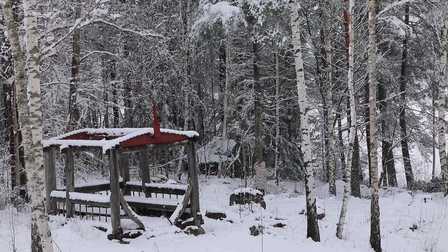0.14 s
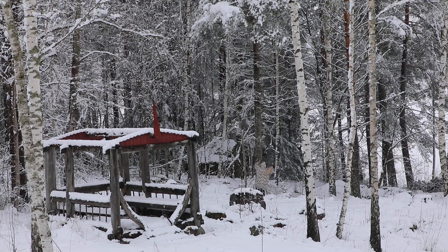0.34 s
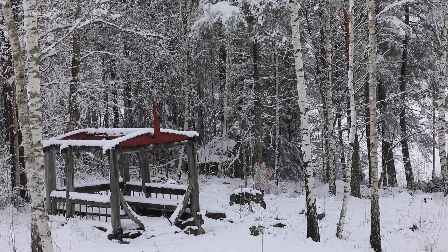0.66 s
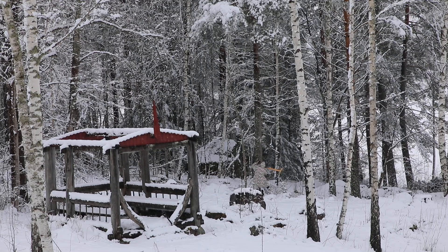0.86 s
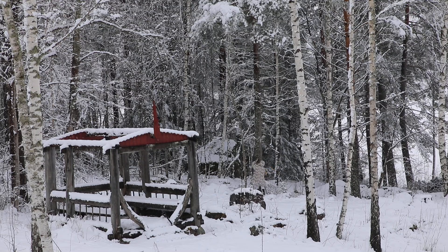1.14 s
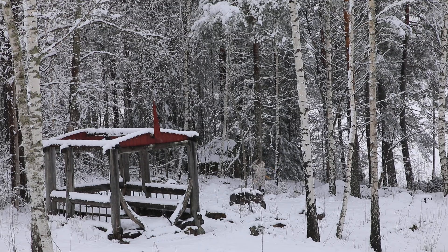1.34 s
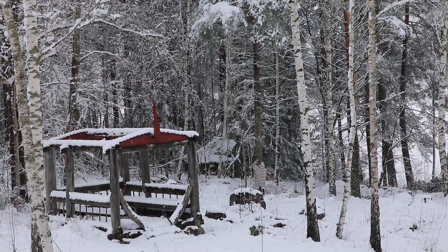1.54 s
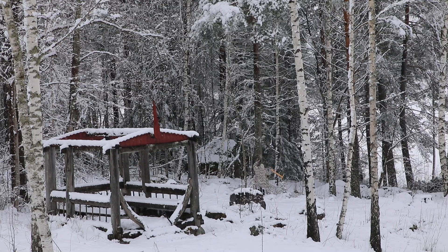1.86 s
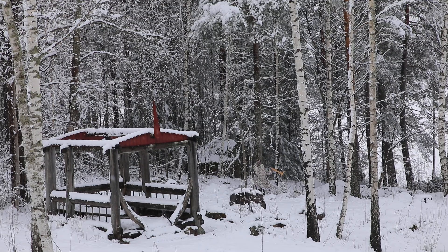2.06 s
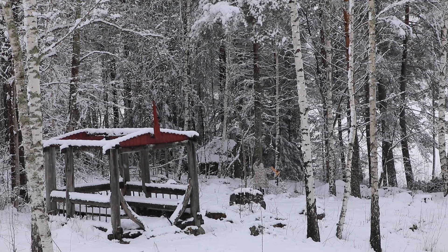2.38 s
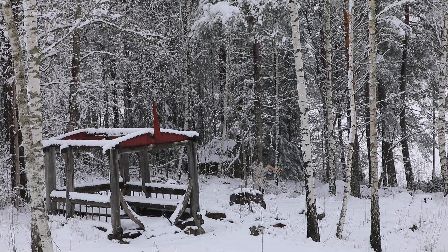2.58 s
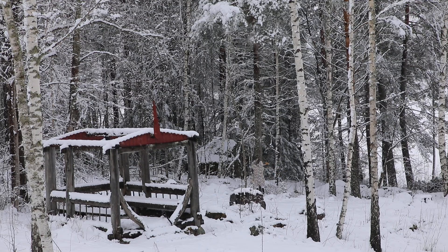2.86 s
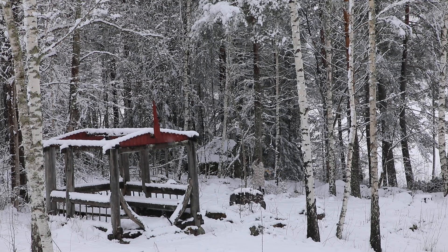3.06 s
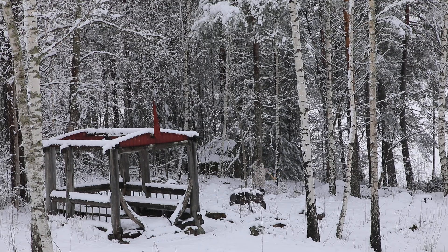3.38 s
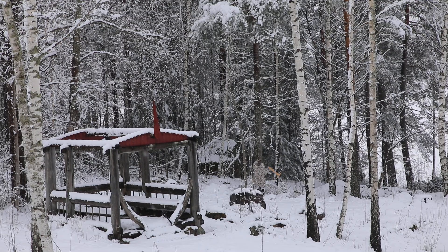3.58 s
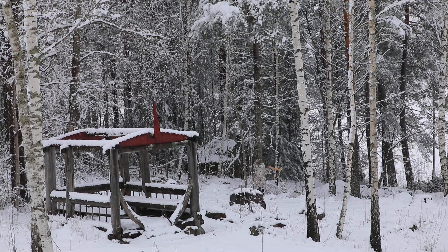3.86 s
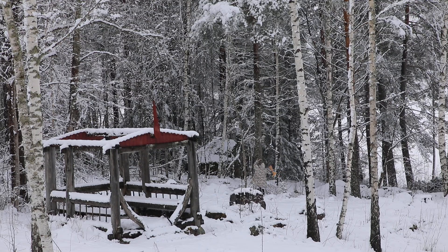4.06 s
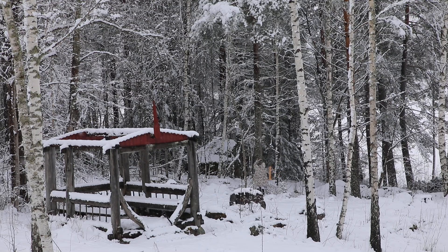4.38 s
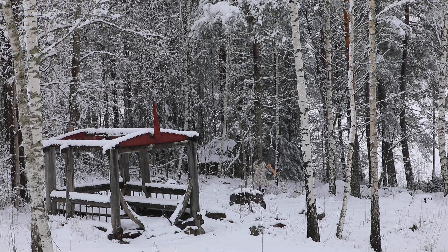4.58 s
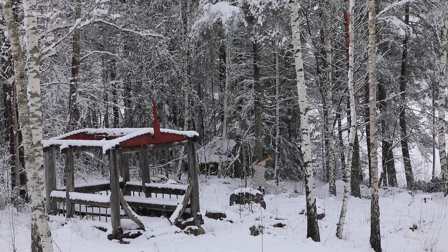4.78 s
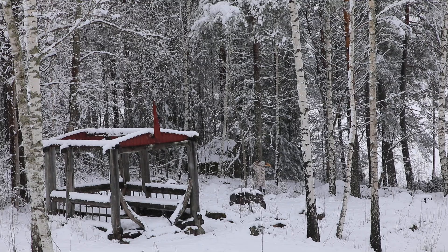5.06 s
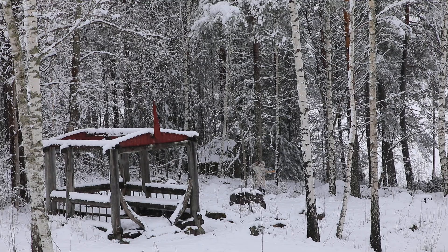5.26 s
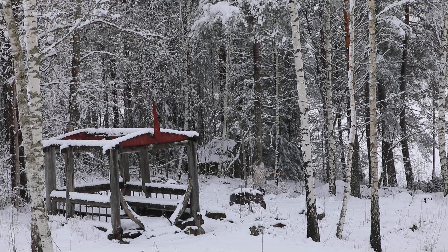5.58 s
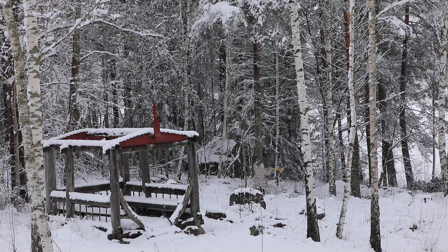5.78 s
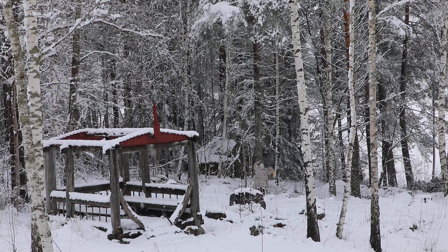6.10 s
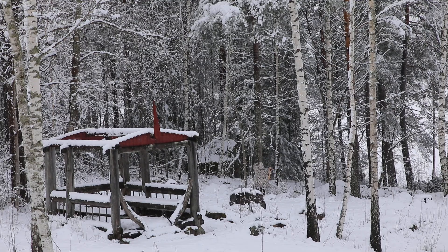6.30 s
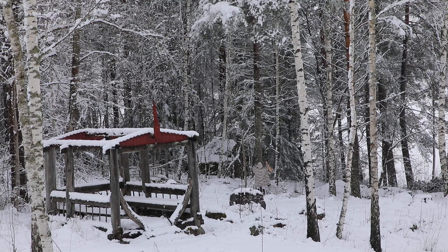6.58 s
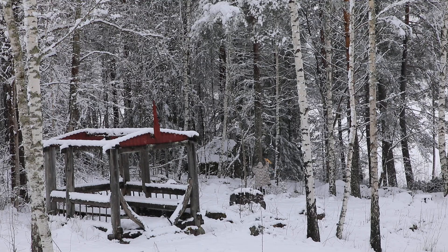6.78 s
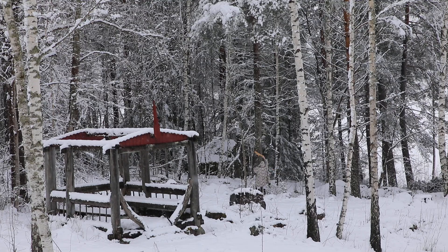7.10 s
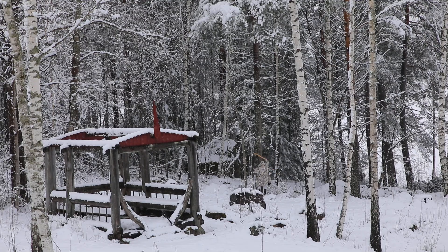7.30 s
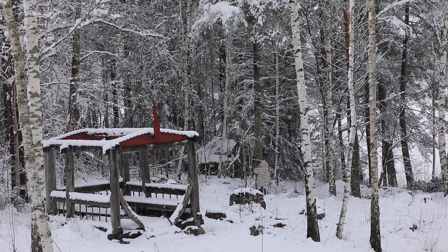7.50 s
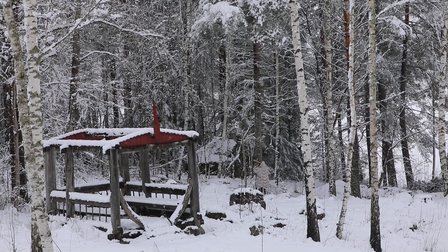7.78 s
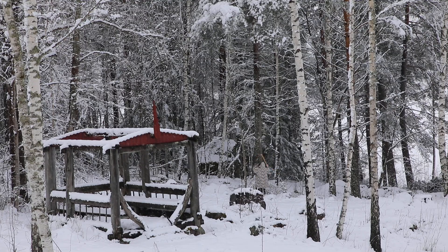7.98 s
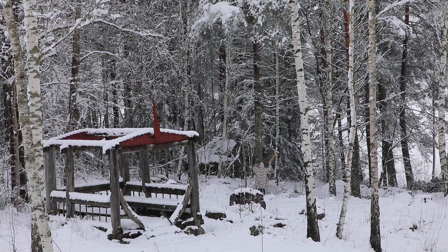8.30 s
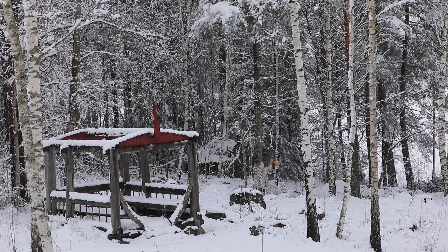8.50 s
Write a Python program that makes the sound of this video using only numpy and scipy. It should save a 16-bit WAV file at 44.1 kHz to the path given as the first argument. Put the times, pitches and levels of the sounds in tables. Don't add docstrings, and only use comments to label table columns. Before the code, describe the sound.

Four separate axe chops ring hollow on a standing trunk in a snowy forest, each with a scattered echo, while small finches chirp faintly between.

```python
import sys
import numpy as np
from scipy import signal
from scipy.fft import rfft, irfft, next_fast_len
from scipy.io import wavfile
from scipy.ndimage import uniform_filter1d, map_coordinates

SR = 44100
rng = np.random.default_rng(int(sys.argv[2]) if len(sys.argv) > 2 else 0)


def ratio(d):
    e = np.asarray(d, float) / 20
    return 10 ** e


def dump(signal):
    limited = np.clip(np.atleast_2d(signal).T, -1, 1)
    pcm = np.round(limited * 32767).astype(np.int16)
    wavfile.write(sys.argv[1], SR, pcm)


N = 381465


def unit(x):
    return x / np.sqrt(np.mean(x ** 2) + 1e-20)


def along(points, hz):
    f, v = np.transpose(points)
    return np.interp(np.log(hz + 1), np.log(f + 1), v)


def curves(rows):
    s, *cols = np.transpose(rows)
    return [np.interp(np.arange(N) / SR, s, c) for c in cols]


def filtered(x, response):
    m = next_fast_len(len(x) + 8192)
    spectrum = rfft(x, m) * response(np.fft.rfftfreq(m, 1 / SR))
    return irfft(spectrum, m)[:len(x)]


def peak(f, hz, width_hz):
    return 1j * f * width_hz / (hz * hz - f * f + 1j * f * width_hz)


def add(out, s, piece):
    part = out[round(s * SR):][:len(piece)]
    part += piece[:len(part)]


def burst(length):
    spectrum = rfft(np.exp(-np.arange(512) / SR / length) * rng.standard_normal(512))
    even = irfft(spectrum / np.abs(spectrum))
    return np.pad(even, (0, SR // 4))


def tail(t60s, rise, lumps_db):
    hz, t, z = signal.stft(rng.standard_normal(2 * SR), SR, nperseg=256)
    lumps = unit(uniform_filter1d(rng.standard_normal(len(t)), size=5))
    decay_db = -60 * t / along(t60s, hz)[:, None]
    fade = ratio(lumps_db * lumps + decay_db) * (1 - np.exp(-t / rise))
    fade = fade / np.linalg.norm(fade, axis=1, keepdims=True)
    h = signal.istft(z * fade, SR, nperseg=256)[1]
    return h / np.linalg.norm(h)


# (frequency [Hz], width [Hz], level in blows 1, 2, 3, 4 [dB])
WOOD_MODES = [(86.2, 39.7, -42, -47.5, -60.5, -41), (249.7, 35, -23, -24, -39.5, -20.5),
              (500, 180, -10, -9.5, -7.5, -8.5), (714, 99, -8.5, -3, 0.5, -6.5),
              (883, 64, -2, 5.5, 5.5, -1.5), (1037, 170, -9, 2, 4, -2.5), (1410, 200, 2, -15, 2.5, -9),
              (1740, 270, -8, 1, 2.5, -9.5), (1925, 74, -36.5, 7, 7.5, -13.5),
              (2173, 170, -6, -0.5, 5, -11), (2540, 120, -6.5, -9, -2.5, -13),
              (2796, 186, 0, -11, -2.5, -7), (3725, 156, -15, -12, -4, -16), (4000, 320, -34, -16, -35, -9)]


def thud(k):
    def response(f):
        modes = 0
        for j, mode in enumerate(WOOD_MODES):
            hz, width_hz, gain_db = mode[0], mode[1], mode[2 + k]
            modes = modes + (-1) ** j * ratio(gain_db) * peak(f, hz, width_hz) / np.sqrt(width_hz)
        return modes / (1 + 1j * f / 4000) ** 3
    push = filtered(burst(0.00049), response)
    return push / np.linalg.norm(push)


# (frequency [Hz], level [dB])
BLADE = [(3200, -21), (4300, 3.5), (5600, -3), (7600, 0.5), (8800, -8), (10500, -9), (12500, -28),
         (15500, -42)]
# (length [s], level of its scatter [dB])
TEARING = [(0.0037, 5), (0.0021, -4), (0.0016, -7), (0.0033, -8)]


def crack(k):
    splinters = filtered(burst(TEARING[k][0]), lambda f: ratio(along(BLADE, f)))
    return splinters / np.linalg.norm(splinters)


# (delay [s], level [dB], treble lost on bark and snow [dB])
NEAR_ECHOES = [(.003, -6.5, -8), (.0055, -4.5, -14.5), (.0082, -2.5, 1.5), (0.012, -17, -25),
               (0.0129, -8.5, -6.5), (.015, -5.5, -11)]


def near_paths(near_db):
    paths = np.zeros((2, SR // 20))
    paths[:, 0] = 1
    lucks = rng.standard_normal((len(NEAR_ECHOES), 2))
    for (delay, echo_db, dull_db), (shift, sign) in zip(NEAR_ECHOES, lucks):
        at = round((delay + .0003 * shift) * SR)
        level_db = near_db + echo_db
        paths[:, at] += ratio([level_db, level_db + dull_db]) * np.sign(sign)
    return paths


# (frequency [Hz], t60 [s])
TWIGS = [(4000, .6), (7500, 0.42), (11000, 0.24), (15000, .15)]


def twig_scatter(k, cracked):
    return ratio(TEARING[k][1]) * signal.fftconvolve(cracked, tail(TWIGS, 0.0072, lumps_db=-0.5))


AROUND = [
    [-20.5, -8, -1, -1, -3.5, 2.5, -3, -11.5, 0, -12.5, -5.5, -19, -28],
    [-17.5, -13.5, -6.5, -0.5, 1, -12.5, -6, 3.5, -9, -17, -9, -15.5, -30],
    [-25, -19.5, -7, 1.5, -6, -13.5, -11.5, 1.5, -8.5, -16, -15.5, -21, -28.5],
    [-22, -8.5, 0, 4.5, -6, -31, -10.5, -5.5, -8, -21, -12, -27, -32],
]
# (frequency [Hz], t60 [s])
SCATTER = [(100, 1), (400, 0.72), (900, 0.62), (2000, 0.51), (4000, 0.51), (8000, 0.17), (14000, 0.22)]
# (frequency [Hz], t60 [s])
FAR_SLOPES = [(200, 2), (860, 3.77), (2000, 1.7), (5000, 3)]
# (frequency [Hz], level [dB])
FOREST_LOSS = [(120, -18), (250, -0.5), (2950, -1.5), (3250, -8), (3600, -8), (4500, -8), (6000, -33.5),
               (9900, -90.5)]
# (delay [s], lift [dB], depth [s])
GROVES = [
    (.1, -0.3, 0.022),
    (.245, 2.5, 0.0526),
    (.58, 0.5, .07),
]
SMEAR = 1.16
SLOPES_DB = -17


def forest(k):
    def response(f):
        power = 0
        for lift_db, mode in zip(AROUND[k], WOOD_MODES[1:]):
            power = power + np.abs(ratio(lift_db) * peak(f, mode[0], SMEAR * mode[1])) ** 2
        return np.sqrt(power) * ratio(along(FOREST_LOSS, f))
    trunks = tail(SCATTER, 0.0057, lumps_db=1.47)
    slopes = ratio(SLOPES_DB) * tail(FAR_SLOPES, 0.067, lumps_db=1.5)
    back = filtered(trunks + slopes, response)
    t = np.arange(len(back)) / SR
    back *= ratio(sum(lift_db * np.exp(-((t - delay) / depth) ** 2) for delay, lift_db, depth in GROVES))
    return back / np.linalg.norm(back)


THUMP_DB, THUMP_GROWS = -57.5, 0.31
THUMP_HZ, THUMP_S, THUMP_LAG_S = 94.3, 0.018, 0.0032


def ground_thump(db):
    u = np.arange(SR // 4) / SR / THUMP_S
    swell = u * np.exp(1 - u)
    return ratio(THUMP_DB + THUMP_GROWS * db) * swell * np.sin(2 * np.pi * THUMP_HZ * THUMP_S * u)


# (time [s], energy [dB], blade crack [dB], near echoes [dB], forest energy [dB])
BLOWS = [
    (1.2188, 5.5, -34.5, -11, 3.5),
    (3.0152, 8.5, -29, -1, 6),
    (5.0512, 13, -24.5, -2.5, 11),
    (7.5328, 8, -23, -5, 3.5),
]


def axe():
    out = np.zeros(N)
    for k, (s, db, crack_db, near_db, forest_db) in enumerate(BLOWS):
        thud_path, crack_path = near_paths(near_db)
        cracked = ratio(db + crack_db) * crack(k)
        add(out, s, signal.fftconvolve(ratio(db) * thud(k), thud_path))
        add(out, s, signal.fftconvolve(cracked, crack_path))
        add(out, s, twig_scatter(k, cracked))
        add(out, s, ratio(forest_db) * forest(k))
        add(out, s + THUMP_LAG_S, ground_thump(db))
    return out


# (time [s], level [dB], centre [Hz], width [Hz], t60 [s])
TICKS = [(.21, -62, 7000, 1500, .02), (0.705, -53, 9300, 6960, 0.038), (1.126, -63, 6000, 4000, .04),
         (5.356, -66, 8150, 3980, .08), (6.186, -60, 7310, 4440, .1), (6.198, -59, 7500, 3980, 0.19),
         (6.868, -64.5, 6000, 3010, 0.07), (8.424, -46, 9020, 9000, 0.0062),
         (8.4266, -31, 6870, 9000, 0.006), (8.4303, -37, 6900, 2000, 0.021),
         (8.434, -41, 6860, 2500, 0.0052), (8.434, -57.5, 6800, 1200, 0.24),
         (8.4435, -49, 2150, 1780, 0.11), (8.446, -48, 556, 906, 0.25), (8.5007, -46, 7060, 9000, .005)]


def ticks():
    out, t = np.zeros(N), np.arange(SR // 4) / SR
    for s, db, hz, width_hz, t60 in TICKS:
        puff = unit(filtered(rng.standard_normal(len(t)), lambda f: peak(f, hz, width_hz) ** 2))
        add(out, s, ratio(db - 60 * t / t60) * (1 - np.exp(-t / 0.00039)) * puff)
    return out


# (time [s], level [dB], dip [Hz], end [Hz])
HOOKS = [(0.073, -60.5, 2690, 2770), (.148, -63.5, 2770, 2900), (.222, -63.5, 2770, 2880),
         (1.208, -64, 2870, 2800), (2.281, -64, 2515, 2810), (4.096, -63, 2670, 2970),
         (4.166, -65, 2500, 3000), (4.69, -61.5, 2630, 2780), (4.768, -61.5, 2700, 2930),
         (4.851, -64.5, 2870, 2740), (4.924, -62, 2660, 2590), (5.628, -65, 2580, 2580),
         (5.703, -65, 2860, 2770), (5.773, -63.5, 2670, 2850), (5.863, -62, 2780, 2740),
         (5.947, -64, 2760, 2590), (6.022, -63.5, 2670, 2590), (6.118, -61, 2660, 2970),
         (6.62, -64, 2520, 2820), (6.69, -62.5, 2590, 2830), (6.767, -63.5, 2800, 2710),
         (6.845, -61, 2850, 2780)]
HOOK_FROM_HZ, HOOK_S, HOOK_BREAK = 3700, .038, 0.58
# (time [s], level [dB], end [Hz])
OPENERS = [(.008, -64, 2860), (1.135, -62, 2880), (2.198, -66, 2420), (2.599, -66, 2830),
           (4.042, -67.5, 3050), (4.622, -64, 3040), (6.55, -66, 2700), (7.502, -64, 2880)]
OPEN_FROM_HZ, OPEN_S = 2450, 0.032
# (time [s], level [dB], pitch [Hz], length [s])
PIPS = [(.04, -66.5, 1195, .06), (0.088, -66, 1026, 0.059), (0.447, -77, 4800, .045),
        (.585, -67, 1153, .046), (0.678, -64, 2460, .015), (0.77, -69, 1030, 0.057)]
PIP_SAG = .02


def finches():
    out = np.zeros(N)
    notes = [(s, db, HOOK_FROM_HZ, dip_hz, end_hz, HOOK_S, HOOK_BREAK) for s, db, dip_hz, end_hz in HOOKS]
    notes += [(s, db, OPEN_FROM_HZ, OPEN_FROM_HZ, end_hz, OPEN_S, 0) for s, db, end_hz in OPENERS]
    notes += [(s, db, hz * (1 + PIP_SAG), hz, hz * (1 - PIP_SAG), length, 0) for s, db, hz, length in PIPS]
    for s, db, start_hz, dip_hz, end_hz, length, gap in notes:
        t = np.arange(round(length * SR)) / SR
        done = t / length
        slide = 1 / (1 + np.exp(-(done - .45) / 0.063))
        hz = dip_hz + (start_hz - dip_hz) * np.exp(-t / 0.0028) + (end_hz - dip_hz) * slide
        swell = (1 - np.exp(-t / 0.0013)) * np.cos(np.pi / 2 * done) ** 0.33
        swell *= 1 - gap * np.exp(-((done - .45) / 0.12) ** 2)
        flutter = unit(uniform_filter1d(rng.standard_normal(SR // 10), size=180))
        swell *= ratio(3.0 * flutter[:len(t)])
        add(out, s, np.sqrt(2) * ratio(db) * swell * np.sin(2 * np.pi * np.cumsum(hz) / SR))
    return out


# (start [s], length [s], level [dB])
WHEEZES = [
    (-.1, .66, -72),
    (5.93, .66, -67),
]
# (frequency [Hz], width [Hz], level [dB])
THROAT = [(3420, 1100, 10), (3980, 400, -2)]
WHEEZE_HZ, WHEEZE_SAG_HZ, SWEEP_HZ, SWELL = 3730, 302, 1320, 0.91
SWEEPS_HZ, SWEEPS_GAIN_HZ = 165.5, 4.5


def wheeze():
    t = np.arange(N) / SR
    drift = map_coordinates(rng.standard_normal(N // 700 + 4), [np.arange(N) / 700])
    out = np.zeros(N)
    for s, length, db in WHEEZES:
        done = np.clip((t - s) / length, 0, 1)
        turn = np.cumsum(SWEEPS_HZ + SWEEPS_GAIN_HZ * done + 2.0 * drift) / SR % 1
        hz = WHEEZE_HZ - WHEEZE_SAG_HZ * done + SWEEP_HZ * (.5 - turn) + 38 * drift
        buzz = np.sin(np.pi * turn) ** 0.47 * np.sin(2 * np.pi * np.cumsum(hz) / SR)
        voiced = filtered(buzz, lambda f: sum(ratio(g) * peak(f, c, w) ** 2 for c, w, g in THROAT))
        out += ratio(db) * np.abs(np.sin(np.pi * done)) ** SWELL * unit(voiced)
    return out


# (time [s], level [dB], half length [s])
GUSTS = [(.42, -59, .03), (1.33, -73, .03), (1.59, -65, 0.036), (1.78, -62, 0.038), (2.27, -58, 0.036),
         (3.59, -64.5, 0.074), (4.19, -70, .05), (4.78, -46.5, 0.059), (4.91, -55.5, 0.062),
         (5.2, -68, .06), (7.86, -71, 0.043), (8.06, -64, .03), (8.15, -55, 0.032), (8.29, -62, 0.028)]
# (frequency [Hz], level [dB per Hz])
RUMBLE = [(15, -33), (35, -6), (52, 0.5), (80, -6), (130, -11.5), (250, -55.5)]
CALM_DB, PUFF_DB = -88, -7


def wind():
    t = np.arange(N) / SR
    bumps = unit(filtered(rng.standard_normal(N), lambda f: ratio(along(RUMBLE, f))))
    puffs = sum(ratio(db + PUFF_DB) * np.exp(-((t - s) / half) ** 2) for s, db, half in GUSTS)
    return (ratio(CALM_DB) + puffs) * bumps


# (time [s], level [dB])
AIR = [(0, -61.5), (1.1, -61.5), (2.9, -62), (6.3, -62.5), (8.65, -62)]
# (frequency [Hz], level [dB per Hz])
HUSH = [(110, -3), (250, 0), (750, -2), (2100, -7), (3200, -12.5), (4300, -16), (5500, -22), (6900, -17.5),
        (8600, -22.5), (10300, -15.5), (12500, -16), (16000, -19)]
HUSH_DB = -62


def air():
    hush = unit(filtered(rng.standard_normal(N), lambda f: ratio(along(HUSH, f)) * f / (f + 1j * 90)))
    low = filtered(hush, lambda f: 1 / (1 + (f / 4000) ** 4))
    drift_db = curves(AIR)[0]
    return ratio(HUSH_DB) * (hush - low + low * ratio(drift_db - HUSH_DB))


# (time [s], level [dB], pitch [Hz])
DRONE = [(0, -83, 50.1), (1.7, -78, 49.5), (1.85, -93, 49), (2, -77, 48), (3.7, -74, 49), (4.2, -83, 37.5),
         (4.4, -95, 35.54), (5.5, -88, 36), (5.8, -83.5, 41.7), (6.4, -81, 56.2), (7.0, -85, 54.7),
         (7.3, -74, 49.8), (7.7, -90, 50), (8.1, -78, 50.3), (8.65, -81, 47.7)]


def engine():
    drone_db, drone_hz = curves(DRONE)
    places = np.broadcast_arrays([[0], [1]], np.arange(N) / 5000)
    waver = map_coordinates(rng.standard_normal((2, N // 5000 + 4)), places)
    phase = 2 * np.pi * np.cumsum(drone_hz + 0.59 * waver[1]) / SR
    return np.sqrt(2) * ratio(drone_db + 1.5 * waver[0]) * np.sin(phase)


# (frequency [Hz], level [dB])
PORT = [(4000, 0), (5500, -1.5), (6900, 1), (8600, -1), (10300, 2.5), (13000, -1.5), (15500, -9)]


def scene():
    birds = finches() + wheeze()
    scatter = tail([(2000, 0.55), (5000, .35)], 0.006, lumps_db=3)
    wet = signal.fftconvolve(birds, scatter)[:N]
    struck = filtered(axe() + ticks(), lambda f: ratio(along(PORT, f)))
    return (struck + birds + ratio(-2.5) * wet + wind() + air() + engine())[None]


def band_limit(x):
    return signal.sosfilt(signal.butter(12, 16200, fs=SR, output="sos"), x)


def record(dry):
    mix = filtered(dry[0], lambda f: f < 15750)[None]
    return band_limit(mix)


dry = scene()
out = record(dry)
dump(out)
```